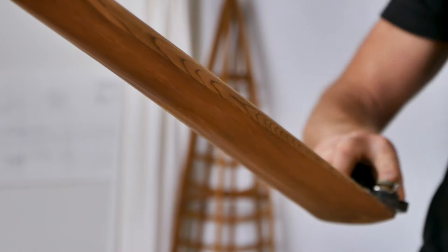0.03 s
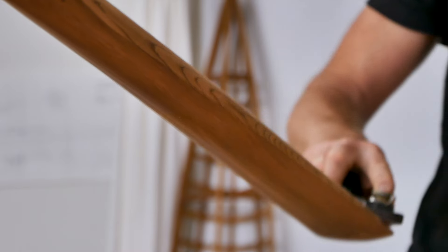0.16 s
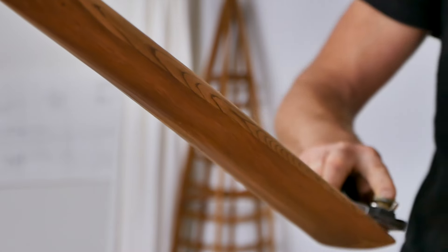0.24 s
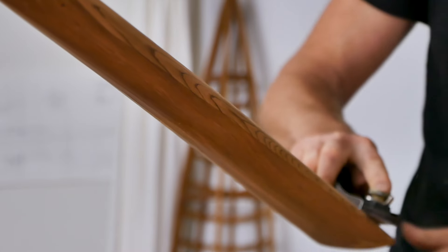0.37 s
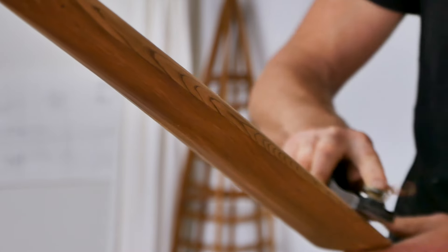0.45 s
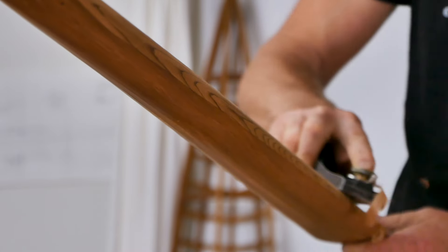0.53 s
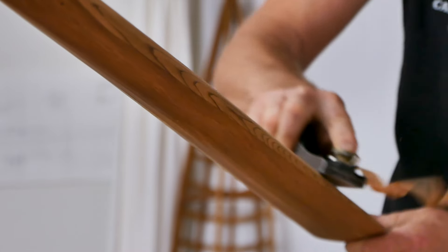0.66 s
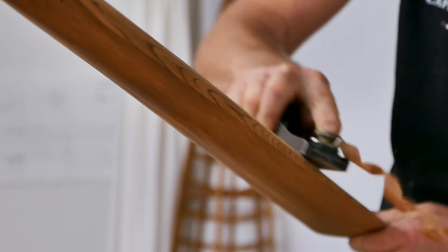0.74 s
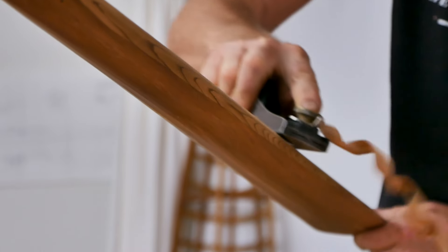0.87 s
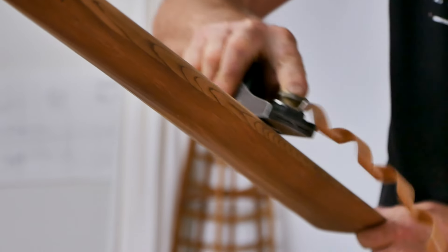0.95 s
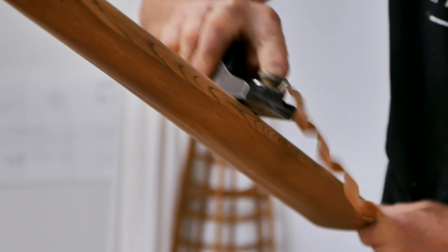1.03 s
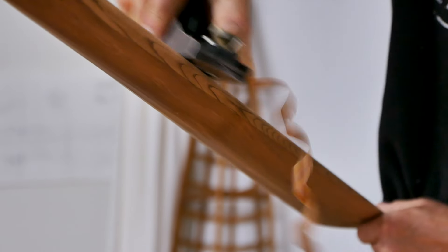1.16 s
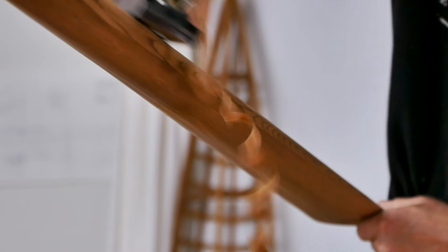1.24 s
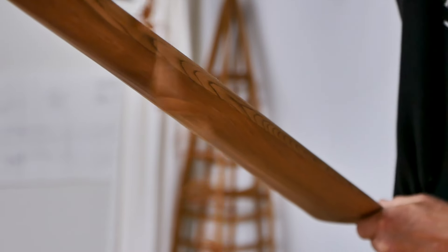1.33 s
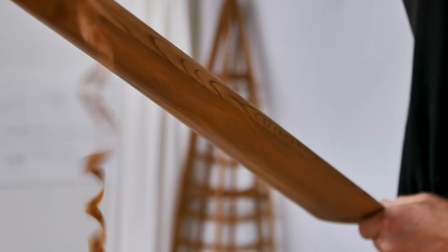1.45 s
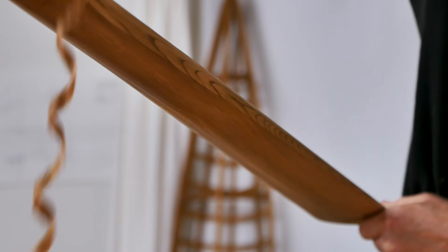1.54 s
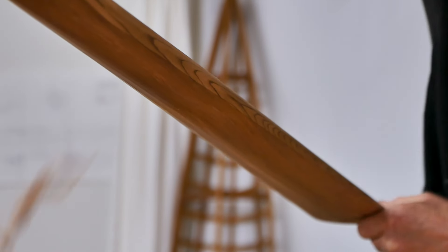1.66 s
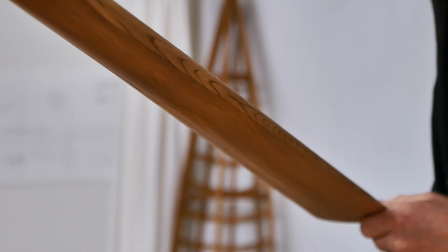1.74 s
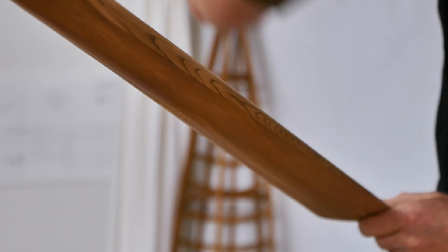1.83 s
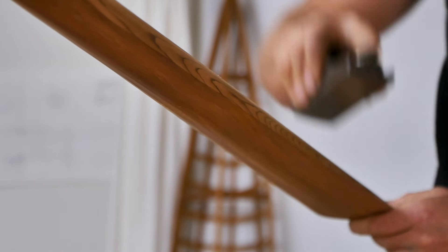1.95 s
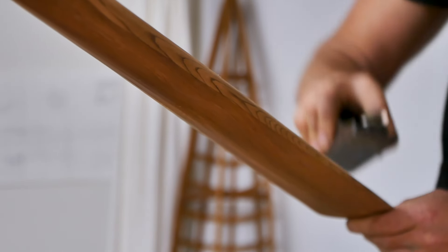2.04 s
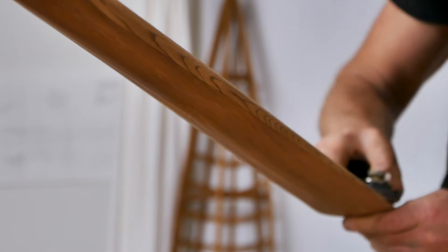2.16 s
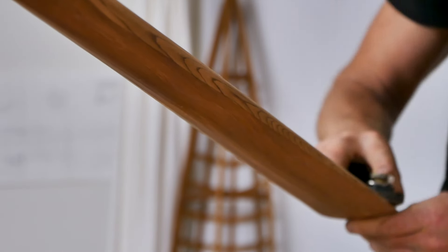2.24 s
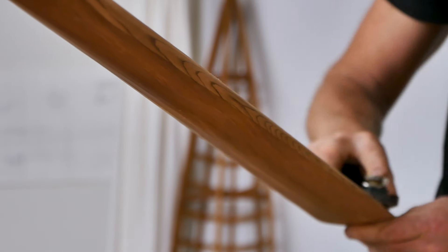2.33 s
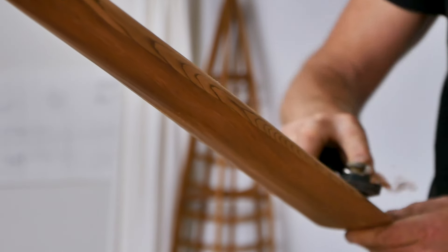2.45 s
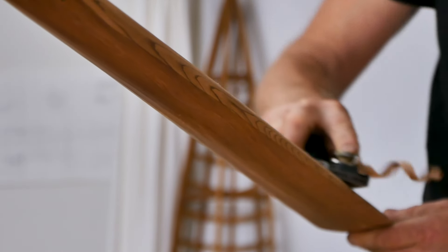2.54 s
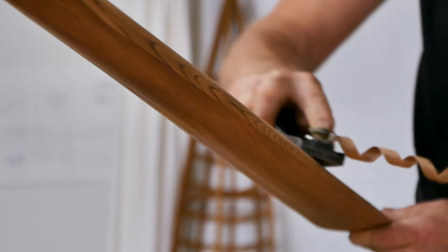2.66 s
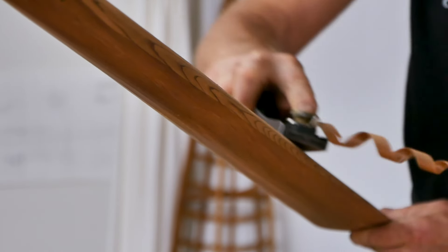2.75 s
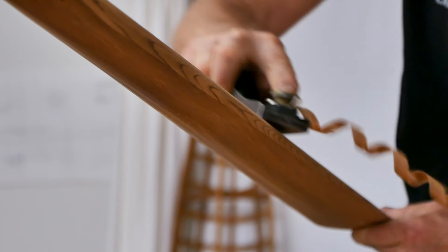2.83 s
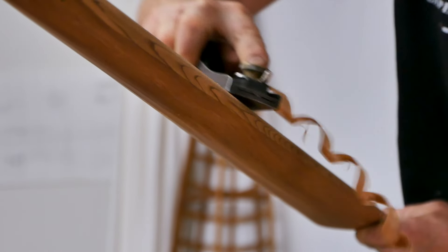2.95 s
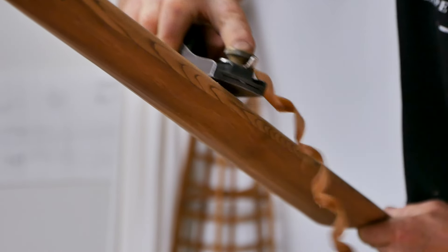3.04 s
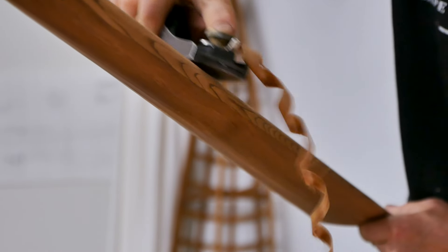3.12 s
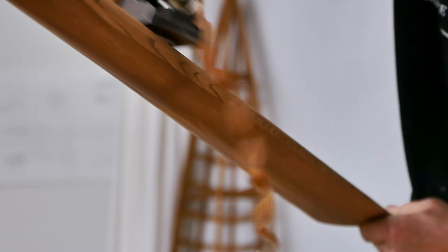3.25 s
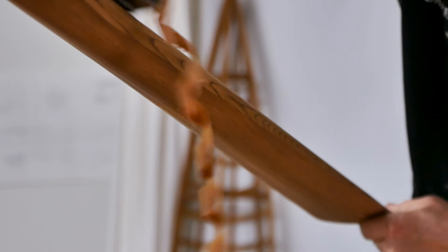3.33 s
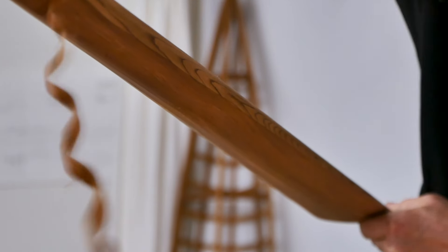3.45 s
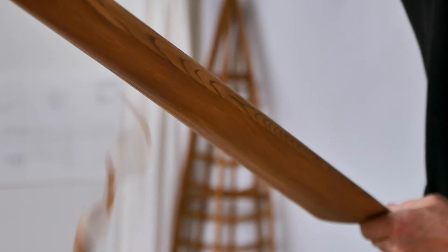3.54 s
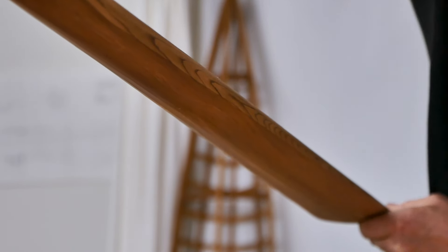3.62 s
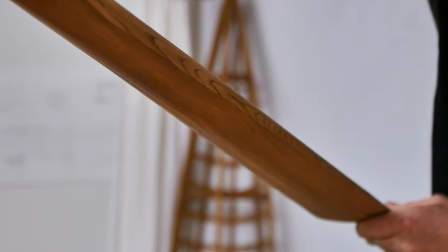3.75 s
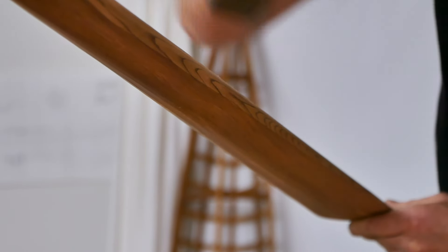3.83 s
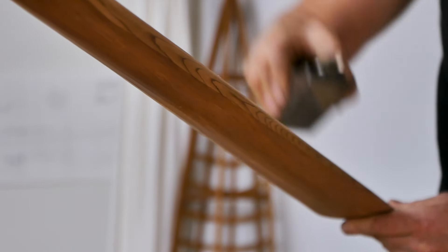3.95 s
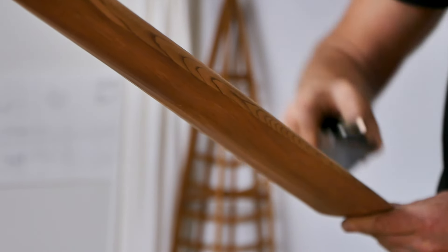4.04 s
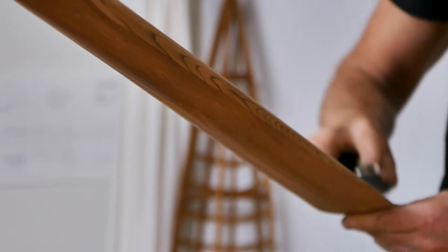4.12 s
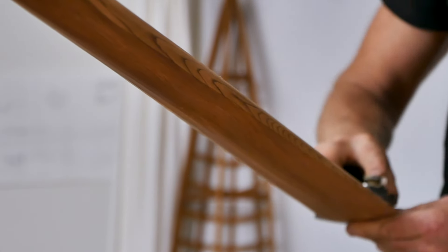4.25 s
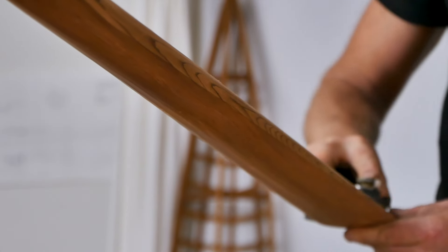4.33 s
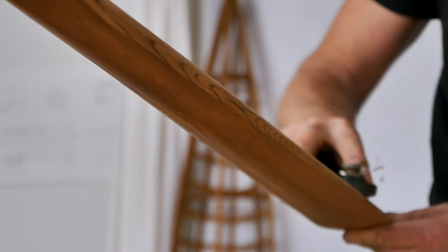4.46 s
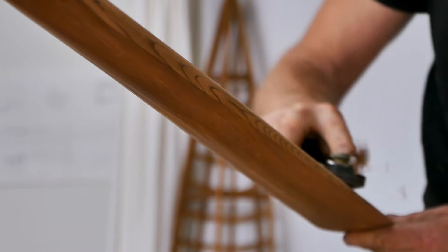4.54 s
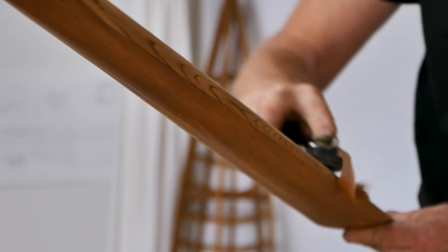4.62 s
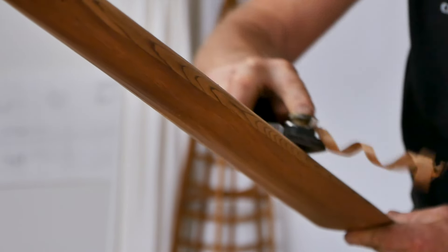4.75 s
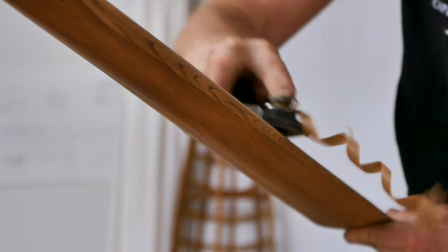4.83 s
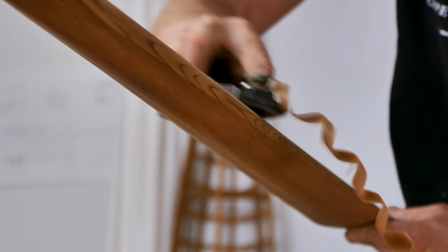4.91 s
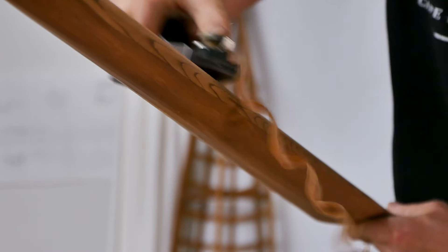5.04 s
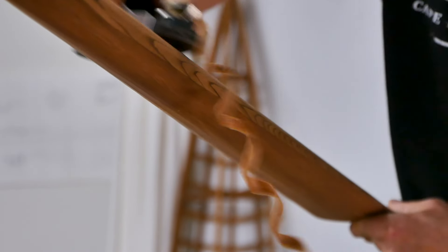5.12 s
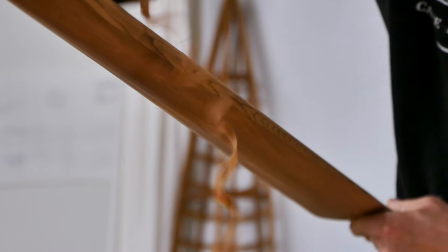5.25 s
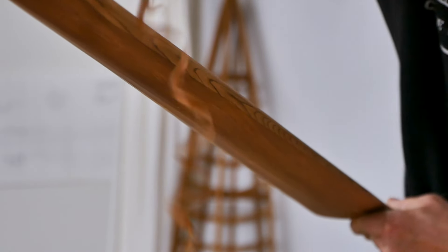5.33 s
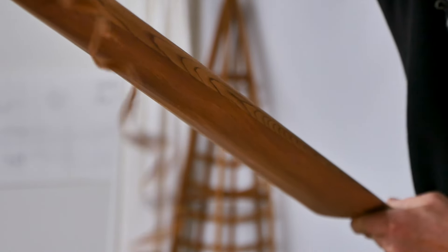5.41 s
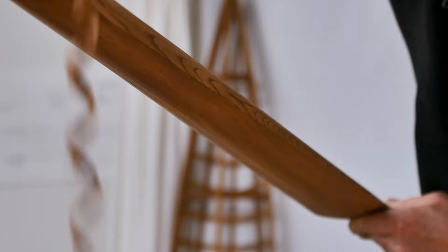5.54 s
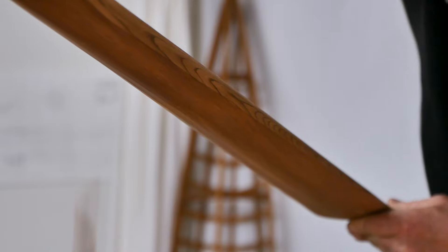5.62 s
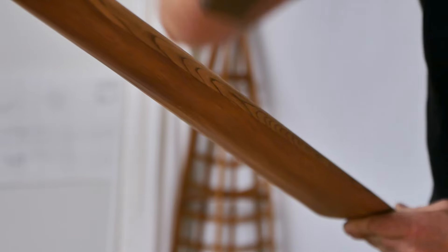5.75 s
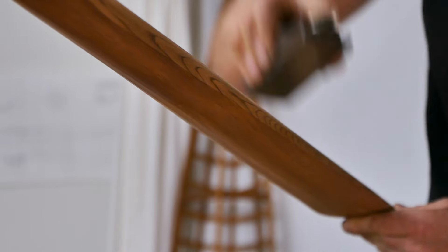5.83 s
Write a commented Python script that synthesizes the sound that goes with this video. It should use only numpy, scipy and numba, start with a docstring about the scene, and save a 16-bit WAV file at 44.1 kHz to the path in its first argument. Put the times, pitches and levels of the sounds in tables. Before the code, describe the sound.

Close up in a small, short-reflecting workshop, a block plane planes a wooden board three times. Each pass starts with a hollow knock, the first one soft, then becomes a grainy tearing drone with a dry rasp and bright hiss lasting about a second. Fibres snap, the board shivers briefly at lift-off, and loose curls rustle faintly between strokes over a quiet rumble.

```python
"""A faint rustle, then a knock: a block plane lands on a soft wooden board and takes three long shavings off it.
Each time the sole slaps down, chatters and rings, then the iron tears through the fibres: irregular tiny clicks
make the board drone, the edge rasp and the shaving hiss. Fibres snap, and the cut gives short, airy notes and rasps.
Around the strokes loose curls rustle, made of faint crinkles, and feet shift softly, made of dull noise.
It is heard close up in a small workshop with short reflections and a quiet rumble."""
import sys
import numpy as np
from scipy import signal
from scipy.fft import rfft, irfft
from scipy.io import wavfile
from scipy.ndimage import uniform_filter1d, map_coordinates
from numba import njit

SR = 44100
rng = np.random.default_rng(int(sys.argv[2]) if len(sys.argv) > 2 else 0)


def wrap_up_sound(samples):
    """Save the sound to the file named by the first command line argument, as 16-bit audio."""
    columns = np.atleast_2d(samples).T
    # keep every value between -1 and 1, then stretch to whole-number steps
    tamed = np.clip(columns, -1, 1)
    steps = np.round(tamed * 32767).astype(np.int16)
    wavfile.write(sys.argv[1], SR, steps)


N = 259308
T = np.arange(N) / SR  # time in seconds

# the plane strokes, with base levels: slide_s, full_bite_s, last_push_s, leaning_in_length_s, lift_off_s,
# board_drone_db, edge_rasp_db, shaving_hiss_db, shudder_db, spring_back_db
STROKES = [(0.162, 0.489, 0.93, 0.38, 1.486, -33, -38.5, -35, -36.5, -48.5),
           (2.313, 2.477, 3.235, 0.037, 3.512, -31.5, -39, -35.5, -44.5, -53),
           (4.305, 4.462, 5.08, 0.24, 5.468, -31.5, -39, -35.5, -44, -41)]
# how each sound follows a stroke: before_speed_db (before the plane gathers speed),
# before_bite_db, gain_from_tip_to_far_end_db, gain_in_last_push_db
DRONE_LAW, RASP_LAW = (-14, -4, -4, 4.5), (-6, -10, -6, 5.5)
HISS_LAW, SHUDDER_LAW = (-10.5, -9, -4.5, -2.5), (-1, -10, -38.5, 9.5)
SETTLE_S, BITE_S, LIFT_S = 0.024, 0.13, 0.016  # the sole settles, the iron sinks in, the iron leaves the wood
# hard and soft spots where the cut surges or skips: centre_s, length_s, wood_db, shaving_db
GRAIN_SPOTS = [(0.472, 0.025, 0, 0.5), (0.505, 0.029, -11, -3), (0.575, 0.066, -3.5, -5.5),
               (0.6, 0.048, 0, 6), (0.687, 0.039, -4.5, -3.5), (0.777, 0.046, 2, 2.5),
               (1.052, 0.026, 0.5, 3), (1.137, 0.047, 2, 2.5), (1.237, 0.049, 1.5, 7), (1.24, 0.2, -3, -3),
               (1.32, 0.038, 0, 7), (1.375, 0.026, -11, -4), (1.427, 0.027, 2, 3.5),
               (1.489, 0.033, -1.5, -9), (3.142, 0.12, -2, -3), (3.273, 0.069, 0, 6),
               (3.337, 0.05, -1.5, 10), (3.426, 0.039, 3, 18.5), (3.468, 0.094, -11.5, -25),
               (4.38, 0.045, -2, -5), (4.556, 0.24, 0.5, 0), (4.66, 0.015, 1.5, 3.5), (4.743, 0.1, -1, -2),
               (5.156, 0.028, -1.5, -4), (5.385, 0.024, 0, 3)]
# board resonances under the sole: pitch_hz, width_hz, tip_db, midway_db, far_end_db
BOARD_RESONANCES = [(404.4, 57.5, -0.5, 5, -13), (498, 186, -1, 2.5, -7.5), (614.4, 16, 6.5, 4, 6),
                    (722, 103, -6, 1, -2.5), (1003, 104, 2.5, 2, -0.5), (1220, 122, -2, -4, -1.5),
                    (1374, 128, -0.5, -4.5, -4), (1754, 270, -5, -8, -6)]
# board bending resonances: tip_hz, top_hz, far_end_hz, width_hz, level_db
BENDING = [(506, 820, 527, 116, -11), (1053, 1278, 917, 100, -8)]
# where the plane is at those three pitches: place (0 tip, 1 far end)
BENDING_PLACES = [.13, .3, .62]
# resonances of the plane, heard in the rasp: pitch_hz, width_hz, tip_db, midway_db, far_end_db
PLANE_RESONANCES = [(2333, 187, 3, 1, 6), (2830, 350, 4.5, 4, -11), (3370, 700, 6, 0.5, -21),
                    (4180, 1290, 1.5, -1.5, -1), (4745, 124, 5, -1, 7), (5130, 600, -8, -26, -5.5),
                    (6080, 220, -1, 0.5, 3), (6720, 650, -5.5, 2, -1), (8360, 1400, -11, -3, -5.5)]
# colour of the low shudder: pitch_hz, level_db
SHUDDER_COLOUR = [(50, -13), (110, -1), (138, -0.5), (155, 11.5), (178, 5), (235, 1.5), (258, 5.5),
                  (282, -6.5), (330, 5), (450, -25.5), (900, -30.5)]
# colour of the shaving's scrape: pitch_hz, level_db
HISS_COLOUR = [(2500, -56), (5500, -2), (8200, -3), (10000, 2), (12000, 1.5), (14000, 5.5), (16000, 0.5)]
# the hiss rises while the curl hangs free and drops in the last push
HISS_HZ, CURL_RISE_HZ, PUSH_DROP_HZ = 12640, 2420, 800
# the dip under the upper band of the hiss
HOLLOW_BELOW_HZ, HOLLOW_WIDTH_HZ, HOLLOW_DEPTH = 1700, 1200, 0.54
# when each curl hangs free: centre_s, length_s
FREE_CURLS = [(0.93, 0.38), (2.85, 0.21), (4.883, 0.27)]
# airy notes and blurred rasps of the cut: centre_s, length_s, pitch_hz, glide_hz_per_s, width_hz, level_db
AIRY_NOTES = [(0.3, 0.22, 4300, 0, 660, -58), (1.05, 0.27, 4930, 0, 160, -50.5),
              (1.3, 0.16, 5230, 1800, 900, -50), (2.97, 0.33, 4800, -250, 160, -53),
              (3.36, 0.19, 4760, 0, 350, -47), (4.83, 0.094, 3780, -700, 200, -53),
              (5.094, 0.25, 4750, -400, 300, -48), (5.285, 0.081, 4820, -15, 230, -43),
              (5.4, 0.15, 5080, 2004, 610, -43)]
# hard grain makes the wood groan: centre_s, length_s, pitch_hz, glide_hz_per_s, width_hz, level_db
GROANS = [(0.3, 0.2, 1670, 2, 119.6, -56.5), (.48, 0.059, 518, 0, 70, -33), (.615, 0.061, 500, 2, 69, -36),
          (.5, 0.12, 1000, 0, 131, -36), (.55, 0.31, 249, 2, 60, -47.5), (1.33, .05, 1760, 0, 160, -38),
          (1.45, 0.058, 255, 0, 60, -51.5), (2.53, 0.096, 1007, 800, 110, -35.5),
          (2.63, 0.048, 1300, -3, 119, -46), (2.67, 0.054, 1022, 0, 110, -38),
          (3.43, 0.027, 1765, 2, 140, -42.5), (4.53, 0.18, 1028, 200, 79, -34),
          (4.55, 0.12, 563, 0, 160, -35.5), (4.675, 0.021, 1100, 0, 260, -32),
          (5.21, 0.08, 2530, 0, 450, -45.5), (5.33, 0.062, 910, 0, 200, -37),
          (5.38, 0.19, 517, -300, 124, -34)]
# the shaving buckles in the mouth: centre_s, length_s, pitch_hz, glide_hz_per_s, width_hz, level_db
BUCKLES = [(0.61, 0.043, 14000, 0, 3200, -43), (1.42, 0.068, 6800, 0, 1900, -49),
           (3.32, 0.13, 11400, 0, 2900, -33.5), (3.29, 0.064, 6500, -2, 2100, -37),
           (3.12, 0.17, 14200, -1500, 3100, -40)]
# the board springs back as the plane leaves: swell before the lift-off, then dying away by 60 dB
SPRING_S, SPRING_T60_S = 0.081, 0.46
# colour of that woody shiver: pitch_hz, level_db
SPRING_COLOUR = [(70, -16), (150, 8.5), (330, -0.5), (520, 14), (800, 2), (2000, -38)]
# the plane is set down, levels before softening: start_s, slap_db, sole_clack_db, ring_db, low_thump_db,
# softness_cutoff_hz, grip_firmness (0-1), rebound_gap_s, rebound_share (0-1, used up to 0.9)
KNOCKS = [(0.1069, -22.5, -29.5, -31, -31, 2940, 0.01, 0.0022, 0.85),
          (2.2473, -7.5, -19.5, -23.5, -23, 7040, 0.09, 0.00232, 0.63),
          (4.2328, 1.5, -21, -24.5, -28, 3750, 1, 0.00204, 0.36)]
# colour of the slap: pitch_hz, level_db
SLAP_COLOUR = [(30, -35), (100, -19), (300, -7.5), (470, 0.5), (650, 3.5), (850, 5.5), (1350, 5),
               (1650, -3.5), (2000, -7.5), (2550, -24), (3050, -3), (3550, -17), (4100, -3.5), (4600, -17),
               (5100, -13), (6500, -14.5), (9000, -24.5), (16000, -19.5)]
# the heel lands after the toe: lag, softness as a cut-off, level
HEEL_S, HEEL_HZ, HEEL_DB = 0.029, 700, -8.5
# sole against wood: pitch_hz, firm_grip_shift_hz, level_db, time_to_fall_60_db_s
SOLE_MODES = [(463, 58, -14, 0.11), (801, 101, -8.5, 0.2), (900, 79, -3, 0.032), (1198, 89, -5.5, 0.06),
              (1246, 129, -3.5, 0.05), (1580, 217, -25, .05), (2390, -130, -6, 0.039),
              (3047, -170, 0, 0.023), (3330, 97, -2, 0.022), (4140, -200, -1.5, 0.022),
              (4960, 298.5, -6, 0.013)]
# ringing of the board with the plane on it: pitch_hz, level_db, time_to_fall_60_db_s
BOARD_MODES = [(153.3, -10, 0.62), (256.3, -5, 0.38), (435.4, -3, 0.26), (504, 4, 0.077), (833, 4, 0.15),
               (980, -7, 0.49), (1014, -13, 0.3), (1210, 1, 0.2), (1280, -9, 0.23), (1340, -9, 0.31),
               (1506, -20, 0.57), (1646, -9.5, 0.29), (2085, -16, 0.41), (2337, -14.5, 0.28),
               (2450, -15, 0.42), (3060, -12, 0.16), (3900, -15, 0.2), (4370, -10, 0.243)]
# colour of the many close, short-lived modes of the wood: pitch_hz, level_db
CLACK_COLOUR = [(300, -24), (800, -48), (1400, -46), (1900, 12.5), (2500, 10.5), (4300, 4), (5500, -5),
                (9000, -31), (16000, -39)]
# colour of the low thump: pitch_hz, level_db
THUMP_COLOUR = [(30, -50), (60, -6), (95, -6.5), (125, -2.5), (165, 1.5), (220, -8.5), (400, -8.5),
                (700, -13), (2000, -33.5)]
# fibres snap and chips tick: start_s, peak_db
SNAPS = [(0.467, -36), (0.515, -22.5), (0.622, -20), (1.345, -25), (1.525, -40.5), (3.265, -20.5),
         (3.276, -14.5), (3.63, -51), (3.848, -53), (3.869, -44), (3.902, -49), (4.043, -58), (4.136, -55),
         (4.441, -27), (4.521, -28), (5.745, -59)]
# colour of a snap: pitch_hz, level_db
CHIP_COLOUR = [(150, -32), (700, -8), (3000, -24), (6500, 3.5), (9000, 4.5), (13000, 11.5), (16000, 1)]
# loose curls drop and settle, levels relative: start_s, swell_s, time_to_fall_60_db_s, level_db
RUSTLES = [(0, 0.0027, 0.67, -53), (1.87, 0.089, 1.6, -50.5), (2.11, 0.051, 1.2, -57),
           (3.855, 0.029, 0.9, -55.5), (3.93, 0.023, 1.2, -55.5), (5.727, 0.019, 0.052, -53),
           (5.81, 0.038, 0.65, -64.5)]
# colour of the rustle: pitch_hz, level_db
RUSTLE_COLOUR = [(100, 7), (500, 5.5), (1500, 0), (4000, -2), (6800, 0.5), (9000, -1), (12500, -1),
                 (16000, -2.5)]
# the freed board hums and the hand bumps the work: start_s, pitch_hz, swell_s, time_to_fall_60_db_s, level_db
BUMPS = [(1.485, 253, 0.02, 0.29, -50), (1.698, 206.7, 0.022, 0.17, -52), (3.525, 255.5, 0.014, 0.4, -51.5),
         (3.6, 154, 0.062, 1, -62)]
# the hand taps the work near the end of the first stroke
TAP_S, TAP_T60_S, TAP_DB = 1.3, 0.09, -53
# colour of the tap: pitch_hz, level_db
TAP_COLOUR = [(100, -6), (350, 0), (900, 3), (1500, -28), (4000, -35)]
# soft footfalls and shifts of weight, levels relative: start_s, level_db
STEPS = [(1.731, -53.5), (1.95, -61), (2.919, -48), (4.11, -56)]
# colour of a footfall: pitch_hz, level_db
STEP_COLOUR = [(25, -19), (55, -1), (90, 7), (160, -14), (240, -34), (500, -45), (1500, -50)]
# colour of the room's background: pitch_hz, level_db
SHOP_COLOUR = [(15, -95), (25, -11.5), (74, -4.5), (223, -13.5), (384, -13.5), (451, -19.5), (575, -17),
               (863, -20), (1230, -25), (2220, -28.5), (4030, -31), (6920, -31), (10700, -34.5),
               (14800, -34), (16000, -35)]
SHOP_DB = -60.5
TOP_HZ = 16000  # nothing much is heard above this


def planing():
    """The iron catches and frees fibres; the same catching shakes the board, the plane and the shaving."""
    gains = sum(stroke(*row) for row in STROKES)
    drone_gain, rasp_gain, hiss_gain, shudder_gain, contact, spring_gain = gains
    # place of the plane (0 tip, 1 far end) and lean of the arm; both return after the lift-off
    travel, pushing = 0, 0
    for _, bite, push, lean, lift, *_ in STROKES:
        back = ramp(lift + .2, .3)
        travel = travel + ramp(bite - BITE_S, lift - bite + BITE_S) - back
        pushing = pushing + ramp(push, lean) - back
    wood_db = sum(db * swell(T, s, length) for s, length, db, _ in GRAIN_SPOTS)
    shaving_db = sum(db * swell(T, s, length) for s, length, _, db in GRAIN_SPOTS)
    free = sum(swell(T, *curl) for curl in FREE_CURLS)
    hiss_hz = HISS_HZ + CURL_RISE_HZ * free - PUSH_DROP_HZ * pushing

    # uneven catching of the iron
    catch_db = walk(rate=320) + 0.13 * walk(rate=60)
    tearing = fractures(rate=4500, spread_db=2) * undb(catch_db)
    splitting = fractures(rate=900, spread_db=1) * undb(catch_db)

    wood = resonate(tearing, BOARD_RESONANCES, travel) + bending(splitting, travel)
    drone = patchy(wood, travel, width_hz=80, rate=9, depth_db=3, sink=.6)
    drone = drone_gain * undb(-2 + wood_db) * drone
    shudder = shudder_gain * undb(-1.5) * unit(colour(tearing, SHUDDER_COLOUR))
    rasp = rasp_gain * undb(-2 + wood_db / 2 + 0.049 * catch_db) * edge_rasp(travel)
    surge_db = walk(rate=65) + 0.2 * walk(rate=14)
    hiss_db = shaving_db + 0.29 * catch_db + surge_db
    hiss = hiss_gain * undb(hiss_db) * shaving_hiss(travel, hiss_hz, free)
    short_notes = contact * (notes(AIRY_NOTES) + notes(GROANS) + notes(BUCKLES))
    spring = spring_gain * unit(colour(tearing, SPRING_COLOUR))
    return drone + shudder + rasp + hiss + short_notes + spring


def stroke(slide, bite, push, lean, lift, drone_db, rasp_db, hiss_db, shudder_db, spring_db):
    """One pass of the plane: the gain of each of its sounds over time."""
    contact = ramp(slide, SETTLE_S) * (1 - ramp(lift - LIFT_S / 2, LIFT_S))
    before_speed = 1 - ramp(slide, bite - slide)
    before_bite = 1 - ramp(bite - BITE_S, BITE_S)
    along = ramp(slide, lift - slide)
    stages = np.array([before_speed, before_bite, along, ramp(push, lean)])
    laws = [(drone_db, DRONE_LAW), (rasp_db, RASP_LAW), (hiss_db, HISS_LAW), (shudder_db, SHUDDER_LAW)]
    drone, rasp, hiss, shudder = (contact * undb(db + np.dot(law, stages)) for db, law in laws)
    spring = burst(lift - SPRING_S, SPRING_S, SPRING_T60_S, spring_db)
    return np.array([drone, rasp, hiss, shudder, contact, spring])


def bending(x, travel):
    """The board's bending resonances climb as the plane leaves the tip, then sink again."""
    out = 0
    for *hzs, width, db in BENDING:
        hz = np.interp(travel, BENDING_PLACES, hzs)
        out = out + undb(db) * unit(resonance(x, hz, width))
    return out


def edge_rasp(travel):
    """Snapping fibres ring the iron and the wood just under it."""
    snapping = fractures(rate=4500, spread_db=0)
    # the free end of the board grows behind the plane, so its fitful resonance glides down and dies away
    end_hz = 4800 * 2 ** (-1.7 * travel + .04 * walk(rate=30))
    free_end = unit(resonance(fractures(rate=9000, spread_db=2), end_hz, width_hz=700))
    share = np.interp(travel, [.12, .25, .5, .7], [0, 1, .8, 0]) * undb(3 * walk(rate=20))
    rasp = resonate(snapping, PLANE_RESONANCES, travel) + undb(-12) * share * free_end
    return patchy(rasp, travel, width_hz=170, rate=13, depth_db=3.2, sink=.5)


def shaving_hiss(travel, hz, free):
    """The shaving scrapes through the mouth and rings in two bands; a hollow opens while it hangs free."""
    scrapes = [colour(fractures(rate=11000, spread_db=3.5), HISS_COLOUR) for _ in range(3)]
    upper = unit(resonance(resonance(scrapes[0], hz, width_hz=4900), hz, width_hz=4900))
    lower = unit(resonance(scrapes[1], 0.75 * hz, width_hz=4500))
    hiss = upper + undb(-3) * lower + undb(-1) * unit(scrapes[2])
    depth = np.minimum(HOLLOW_DEPTH * free, 1)
    hiss = hiss - depth * resonance(hiss, hz - HOLLOW_BELOW_HZ, HOLLOW_WIDTH_HZ)
    return patchy(hiss, travel, width_hz=550, rate=20, depth_db=2.5, sink=0)


def notes(table):
    """Short, airy sounds that swell and fade: friction, made of noise, driving one resonance at a time."""
    out = 0
    for s, length, hz, glide, width_hz, db in table:
        pitch = hz + glide * np.clip(T - s, -length, length)
        note = resonance(resonance(rng.standard_normal(N), pitch, width_hz), pitch, width_hz)
        out = out + undb(db) * swell(T, s, length) * unit(note)
    return out


def knocks():
    """The sole slaps down and chatters on crushing fibres; the wood rings, the heel lands, the support thumps."""
    out = 0
    for s, slap_db, sole_db, board_db, thump_db, soft_hz, grip, chatter_s, rebound in KNOCKS:
        slap = sole_slap(chatter_s, rebound)
        clack = unit(colour(rng.standard_normal(N), CLACK_COLOUR)) * fade(.28)
        ring = undb(-5) * (np.pad(board_ring(), (0, N - SR)) + clack / 2)
        thump = unit(colour(rng.standard_normal(N), THUMP_COLOUR)) * fade(.32) * ramp(0, HEEL_S) ** 2
        blow = undb(slap_db) * slap / np.abs(slap).max()
        blow = blow + undb(sole_db) * sole_clack(grip) + undb(board_db) * ring + undb(thump_db) * thump
        softened = signal.lfilter(*signal.butter(1, min(soft_hz, TOP_HZ), fs=SR), blow)
        out = out + delay(softened, s)
    return out


def sole_slap(chatter_s, rebound):
    """Evenly spaced rebounds, each weaker and longer, give the knock its hollow, woody pitch."""
    chatter = 0
    for k in range(6):
        push = signal.windows.hann(3 + 7 * k)
        push = np.pad(push / push.sum(), (0, N))
        chatter = chatter + min(rebound, .9) ** k * delay(push, k * chatter_s)
    crack = rng.standard_normal(N) * fade(.028)
    slap = colour(chatter + undb(-9) * crack / np.linalg.norm(crack), SLAP_COLOUR)
    heel = signal.lfilter(*signal.butter(1, HEEL_HZ, fs=SR), slap)
    return slap + undb(HEEL_DB) * delay(heel, HEEL_S)


def sole_clack(grip):
    """Short modes of sole and wood, shifted by a firm grip, build up as the sole comes flat; little bass."""
    modes = 0
    for hz, shift_hz, db, t60 in SOLE_MODES:
        modes = modes + undb(db) * fade(t60) * np.sin(2 * np.pi * (hz + grip * shift_hz) * T)
    return signal.lfilter(*signal.butter(2, 330, "high", fs=SR), modes * ramp(0, .0018))


def board_ring():
    """One second of the board ringing after a blow; its modes are heard in unrelated phases."""
    t = T[:SR]
    out = 0
    for hz, db, t60 in BOARD_MODES:
        out = out + undb(db - 60 * t / t60) * np.sin(2 * np.pi * (hz * t + rng.random()))
    return out


def snaps():
    """Single fibres and chips crack: short, bright bursts of noise."""
    out = 0
    for s, db in SNAPS:
        crack = colour(rng.standard_normal(N) * fade(0.033), CHIP_COLOUR)
        out = out + delay(undb(db) * crack / np.abs(crack).max(), s)
    return out


def falling_curl():
    """The loose shaving swishes and crinkles unevenly as it drops and settles."""
    crinkle = colour(fractures(rate=5000, spread_db=4), RUSTLE_COLOUR)
    swish = patchy(crinkle, np.zeros(N), width_hz=2200, rate=22, depth_db=2.4, sink=0)
    gain = sum(burst(*row) for row in RUSTLES)
    flutter_db = 1.3 * walk(rate=30)
    return swish * gain * undb(-5.5 + flutter_db)


def bump():
    """The freed board hums briefly; the hand taps the work and bumps it."""
    hums = 0
    for s, hz, rise, t60, db in BUMPS:
        hums = hums + np.sqrt(2) * np.sin(2 * np.pi * hz * T) * burst(s, rise, t60, db)
    waver_db = 1.5 * walk(rate=45)
    tap_gain = delay(undb(TAP_DB) * fade(TAP_T60_S), TAP_S)
    tap = unit(colour(rng.standard_normal(N), TAP_COLOUR)) * tap_gain
    return hums * undb(waver_db) + tap


def footfalls():
    """Dull, slow thuds in the floor as the worker shifts weight."""
    thud = fade(0.8) * (1 - fade(0.16))
    weight = sum(delay(undb(db) * thud, s) for s, db in STEPS)
    return weight * unit(colour(rng.standard_normal(N), STEP_COLOUR))


def workshop(x):
    """Diffuse reflections of a small room, weaker above the drone of the board and shortest in the top treble."""
    low = signal.lfilter(*signal.butter(3, 1300, fs=SR), rng.standard_normal(N))
    high = signal.lfilter(*signal.butter(2, [1400, 8000], "band", fs=SR), rng.standard_normal(N))
    air = signal.lfilter(*signal.butter(2, 8000, "high", fs=SR), rng.standard_normal(N))
    tail = 0
    # each band: noise, level in dB, seconds to fall 60 dB
    for band, db, t60 in [(low, -6, 0.35), (high, -12, 0.47), (air, -12, 0.29)]:
        tail = tail + undb(db) * band * fade(t60) / np.linalg.norm(fade(t60))
    return x + convolve(x, delay(tail, .006))


def room_tone():
    """Quiet, slightly restless rumble with a faint hiss, made of coloured noise."""
    restless_db = 0.6 * walk(rate=9)
    return undb(SHOP_DB + restless_db) * unit(colour(rng.standard_normal(N), SHOP_COLOUR))


def fractures(rate, spread_db):
    """Tiny clicks of uneven size at random moments, about rate a second, scaled to rms 1."""
    size = undb(spread_db * np.minimum(rng.exponential(size=N), np.pi))
    return unit((rng.random(N) < rate / SR) * size * rng.standard_normal(N))


def resonate(x, table, travel):
    """Ring a table of resonances, weighted by the place of the plane (0 tip, 1 far end)."""
    out = 0
    for k, (hz, width, *dbs) in enumerate(table):
        gain = undb(np.interp(travel, [.15, .45, .72], dbs))
        # neighbouring modes swing in opposite phase
        out = out + (-1) ** k * gain * resonance(x, hz, width)
    return unit(out)


def patchy(x, travel, width_hz, rate, depth_db, sink, size=1024):
    """Narrow bands swell and fade unevenly; with sink, they fall in pitch as the plane travels."""
    hz, s, cells = signal.stft(x, SR, nperseg=size)
    row = hz[:, None] * (1 + sink * np.interp(s, T, travel)) / width_hz
    column = np.broadcast_to(s * rate, row.shape)
    field = rng.standard_normal((256, 256))
    db = depth_db * map_coordinates(field, [row, column], order=3, mode="wrap")
    return unit(signal.istft(cells * undb(db), SR, nperseg=size)[1][:N])


def resonance(x, hz, width_hz):
    """One resonance, fixed or moving."""
    # the tiny offset keeps the filter from working on vanishingly small numbers
    return svf(x + 1e-18, hz * np.ones(N), float(width_hz))


@njit
def svf(x, hz, width):
    """State-variable band-pass with a moving centre, gain 1 there."""
    y, b, l = np.empty(len(x)), 0., 0.
    for i in range(len(x)):
        g, k = np.tan(np.pi * min(hz[i], .45 * SR) / SR), width / hz[i]
        v = (b + g * (x[i] - l)) / (1 + g * (g + k))
        b, l, y[i] = 2 * v - b, l + 2 * g * v, k * v
    return y


def colour(x, points, size=4096):
    """Shape a sound's spectrum by (Hz, dB) points without smearing it ahead in time."""
    hz, db = np.transpose(points)
    bins = np.maximum(np.arange(size // 2 + 1) * SR / size, 1)
    # folding the cepstrum gives a minimum-phase filter
    cepstrum = irfft(np.log(undb(np.interp(np.log(bins), np.log(hz), db))))
    cepstrum[1:size // 2] *= 2
    cepstrum[size // 2 + 1:] = 0
    return convolve(x, irfft(np.exp(rfft(cepstrum))))


def convolve(x, response):
    """Pass a sound through an impulse response."""
    return signal.fftconvolve(x, response)[:N]


def walk(rate):
    """Random levels held 1 / rate s and slewed, scaled to rms 1."""
    hold = max(int(SR / rate), 1)
    return unit(uniform_filter1d(rng.standard_normal(N)[np.arange(N) // hold], hold))


def burst(s, rise, t60, db):
    """Gain that rises from s to a level and then dies away."""
    return ramp(s, rise) * undb(db - 60 * np.maximum(T - s - rise, 0) / t60)


def swell(x, centre, width):
    """A bell of height 1, width wide at half height."""
    return 2 ** -(2 * (x - centre) / width) ** 2


def ramp(start, length):
    """Rise from 0 to 1 over length seconds."""
    return np.clip((T - start) / length, 0, 1)


def fade(t60):
    """Exponential decay from time zero, 60 dB in t60 seconds."""
    return undb(-60 * T / t60)


def delay(x, s):
    """Shift a sound later by s seconds."""
    return np.pad(x, (max(int(s * SR), 0), 0))[:N]


def undb(db):
    """Decibels to gain."""
    return 10 ** (np.asarray(db) / 20)


def unit(x):
    """Scale to rms 1."""
    return x / np.sqrt(np.mean(x ** 2))


def scene():
    """All sources in the room, the same in both channels."""
    plane = planing() + knocks() + snaps()
    around = falling_curl() + bump() + footfalls()
    mono = workshop(plane + around) + room_tone()
    return np.array([mono, mono])


def record(dry):
    """The recorder cuts the top steeply."""
    return signal.sosfilt(signal.ellip(12, .1, 80, TOP_HZ, fs=SR, output="sos"), dry)


dry = scene()
out = record(dry)
wrap_up_sound(out)
```